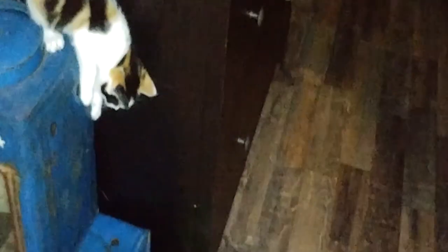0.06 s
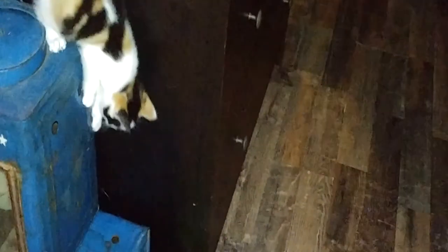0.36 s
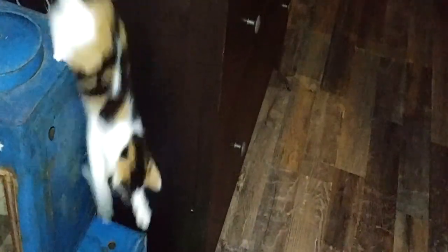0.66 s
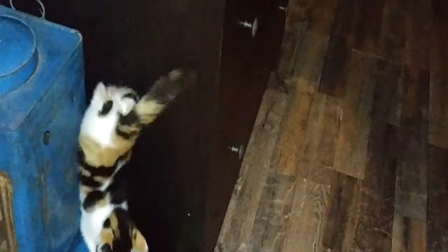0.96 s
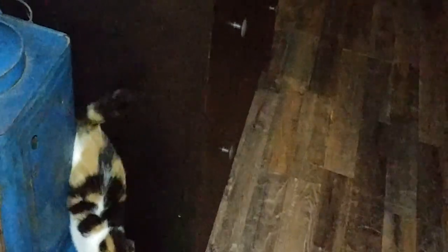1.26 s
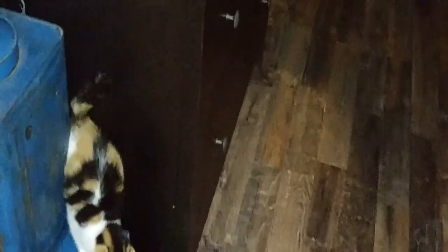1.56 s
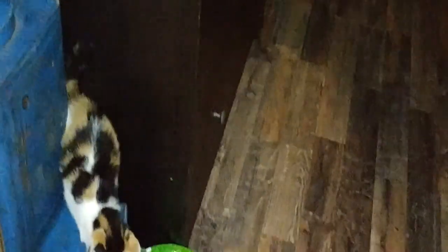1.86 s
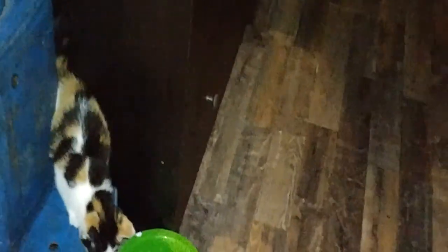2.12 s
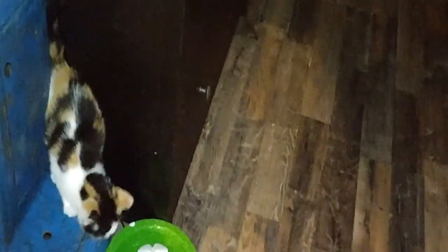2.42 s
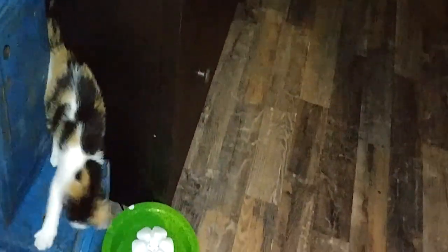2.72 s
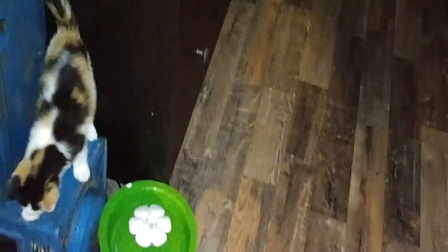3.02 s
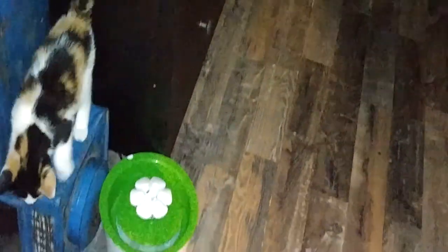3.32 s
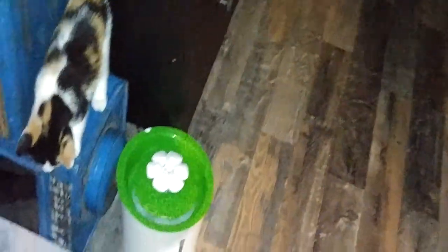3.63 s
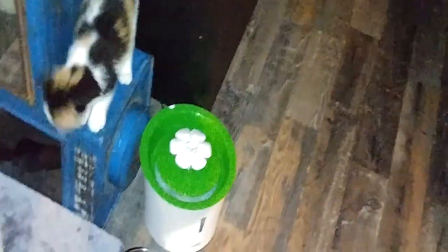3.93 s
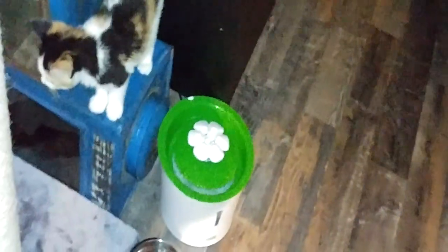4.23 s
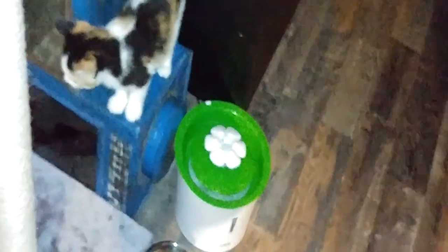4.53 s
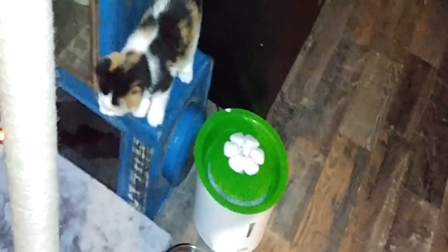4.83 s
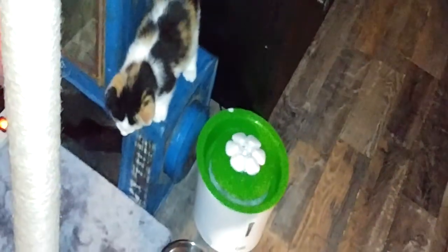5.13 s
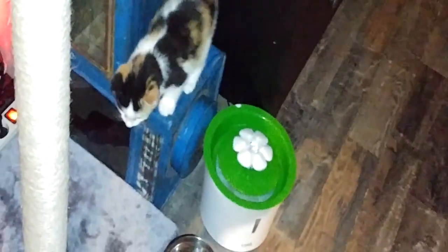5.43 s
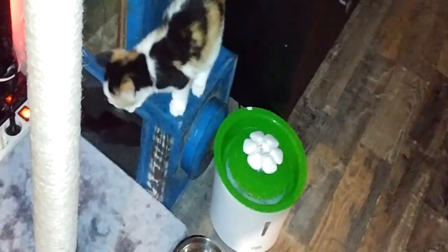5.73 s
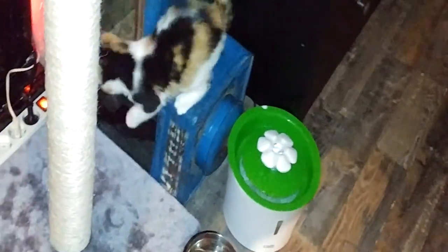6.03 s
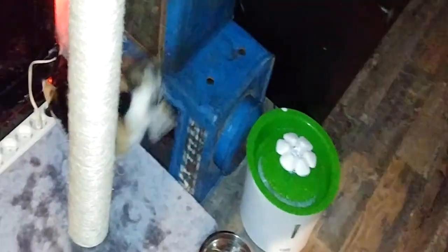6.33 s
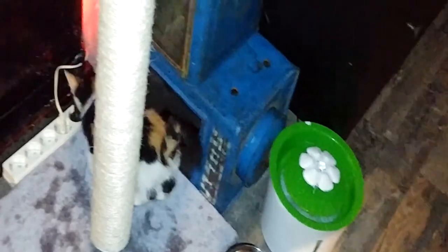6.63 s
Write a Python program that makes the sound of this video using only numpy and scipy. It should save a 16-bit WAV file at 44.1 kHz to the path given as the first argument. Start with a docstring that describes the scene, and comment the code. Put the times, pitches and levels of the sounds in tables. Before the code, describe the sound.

In a quiet room with a low hum and a faint distant motor, a kitten's claws scratch down painted metal, with hollow paw thumps and a soft landing. Two sharp snaps hit the microphone on the left, a few seconds apart, with tiny claw taps between them. Near the end come brief squeaks, a bright clatter of something hard, a small clink and two padded steps.

```python
"""A kitten slides down the side of a small metal stove on its claws, thumps the panel and lands on a ledge.
Something brushes the left microphone's opening with a sharp snap, claws tap lightly, and a second snap
follows. Then a hard object squeaks and clatters in the room, a smaller piece clinks, and two soft steps
sound on the ledge. Under it all lie a low room rumble, a steady hum and the faint drone of a far motor
that slowly rises, then sinks and fades."""
import sys
import numpy as np
from scipy import signal
from scipy.fft import rfft, irfft, next_fast_len
from scipy.io import wavfile

SR = 44100
rng = np.random.default_rng(int(sys.argv[2]) if len(sys.argv) > 2 else 0)


def log_audio(samples):
    """Write samples as a 16-bit WAV file to the path given in sys.argv[1]."""
    # one column per channel
    frames = np.atleast_2d(samples).T
    # limit to full scale, then quantise
    limited = np.clip(frames, -1, 1)
    pcm = np.round(limited * 32767).astype(np.int16)
    wavfile.write(sys.argv[1], SR, pcm)


N = 294147
TIME = np.arange(N) / SR

# tone colour (strength at each frequency) of claws on painted metal: f/Hz, level/dB
CLAW_COLOUR = [(700, -22), (1900, -5), (2700, 1.5), (3400, 0), (4200, 3), (6500, -1), (7700, 0.5),
               (9000, -13), (10300, -38), (12400, -22), (15000, -23), (17000, -31)]
# snaps at the microphone: t/s, tick/dB, air push/dB, sharp edge/dB, lead-in/s, first slip/dB, friction/dB
MIC_SNAPS = [(1.6041, -3, 1.5, -13.5, .0222, -20.5, -31), (4.3865, -2.5, -5.5, -35.5, .0039, -9, -35)]


def from_db(db):
    """Turn decibels into a factor to multiply by."""
    return 10 ** (np.asarray(db) / 20)


def rms_one(x):
    """Scale a signal so that its average strength (rms) is 1."""
    return x / np.sqrt(np.mean(x ** 2) + 1e-20)


def in_time(rows):
    """Join timed rows with straight lines, giving one curve per value column."""
    times, *columns = np.transpose(rows)
    return [np.interp(TIME, times, column) for column in columns]


def at_hz(points, hz):
    """Read between a table's rows, with every octave equally wide."""
    freqs, values = np.transpose(points)
    return np.interp(np.log(np.maximum(hz, 1)), np.log(freqs), values)


def pan(left_db):
    """Left and right gains that make the left side louder by left_db."""
    gains = from_db([[left_db / 2], [-left_db / 2]])
    return gains / gains.mean()


def drift(turns_per_s):
    """A random wandering curve of typical size 1."""
    knots = rng.standard_normal(int(N / SR * turns_per_s) + 2)
    return rms_one(np.interp(TIME * turns_per_s, np.arange(len(knots)), knots))


def envelope(start, attack_s, hold_s, fade_db_per_s):
    """Swell, hold, then die away."""
    age = TIME - start
    fade_db = np.clip(fade_db_per_s * (age - attack_s - hold_s), 0, 200)
    return np.clip(age / attack_s, 0, 1) * from_db(-fade_db)


def lowpass(x, hz, order=2):
    """Turn down what lies above hz."""
    return signal.sosfilt(signal.butter(order, min(hz, .45 * SR), fs=SR, output="sos"), x + 1e-18)


def highpass(x, hz, order=4):
    """Turn down what lies below hz."""
    return signal.sosfilt(signal.butter(order, hz, "high", fs=SR, output="sos"), x)


def through(x, response):
    """Let every sample of x set off a copy of the response (convolution)."""
    return signal.fftconvolve(np.atleast_2d(x), np.atleast_2d(response), axes=-1)[:, :N]


def impulse(colour, size=4096):
    """A short click with the given tone colour; peak 1."""
    cepstrum = irfft(np.log(from_db(at_hz(colour, np.fft.rfftfreq(size, 1 / SR)))))
    # pack the energy at the start (minimum phase)
    cepstrum[1:size // 2] *= 2
    cepstrum[size // 2 + 1:] = 0
    response = irfft(np.exp(rfft(cepstrum)))
    return response / np.abs(response).max()


def ringing(modes):
    """The fading tones of a struck body; each drops 60 dB in its ring time, t60."""
    t = TIME[:SR]
    response = sum(from_db(db - 60 * t / t60) * np.sin(2 * np.pi * hz * t) for hz, db, t60 in modes)
    return response / np.abs(response).max()


def clicks(times, levels_db):
    """One single-sample spike per contact."""
    samples = np.clip(np.round(np.atleast_1d(times) * SR), 0, N - 1).astype(int)
    return np.bincount(samples, from_db(np.atleast_1d(levels_db)), N)


def noise(colour):
    """Stereo noise of a given tone colour; the two sides are alike in the bass, not in the treble."""
    # how alike left and right are: f/Hz, correlation (1 = the same)
    likeness = [(30, .7), (60, 0.87), (120, 0.75), (300, 0.69), (700, 0.31), (2000, 0.23), (8000, 0.064)]
    size = next_fast_len(N)
    hz = np.fft.rfftfreq(size, 1 / SR)
    alike = np.clip(at_hz(likeness, hz), 0, 1)
    mid, side = rfft(rng.standard_normal((2, size))) * from_db(at_hz(colour, hz))
    spectrum = np.sqrt(1 + alike) * mid + np.sqrt(1 - alike) * side * [[1], [-1]]
    return rms_one(irfft(spectrum, size)[:, :N])


def room(x, wet_db):
    """Add the room's echo at level wet_db; its treble dies fastest."""
    # how long the room rings: f/Hz, ring time/s
    ring_times = [(100, 0.52), (400, 0.35), (1200, 0.35), (4000, .32), (8000, 0.29), (14000, 0.25)]
    size = SR // 2
    hz, t = np.fft.rfftfreq(size, 1 / SR), TIME[:size]
    white = rfft(noise([(20, 0), (20000, 0)])[:, :size])
    edges = np.geomspace(40, SR / 2, 13)
    tail = 0
    for low, high in zip(edges, edges[1:]):
        band = irfft(white * (hz >= low) * (hz < high), size)
        tail += band * from_db(-60 * t / at_hz(ring_times, np.sqrt(low * high)))
    tail *= 1 - np.exp(-t / .002)
    return x + from_db(wet_db) * through(x, rms_one(tail) / np.sqrt(size))


def nearby(x, wet_db, t60):
    """Add quick, dense echoes from the floor and furniture."""
    t = TIME[:SR // 6]
    echoes = rng.standard_normal((2, len(t))) * from_db(-60 * t / t60)
    return x + from_db(wet_db) * through(x, rms_one(echoes) / np.sqrt(len(t)))


def rumble():
    """The room's low noise, a little louder at first."""
    # tone colour of the rumble: f/Hz, level/dB
    colour = [(20, -29.5), (40, -21.5), (55, -11), (72, -0.5), (100, -2), (125, -6), (210, -6), (330, -8.5),
              (430, -14), (800, -15.5), (1600, -24.5), (3200, -32.5), (6500, -36.5), (10000, -45.5),
              (16000, -38.5)]
    # its loudness over time: t/s, level/dB
    loudness = [(0, -51), (.85, -58), (2, -57), (4.8, -55.5), (6.7, -57)]
    return noise(colour) * from_db(in_time(loudness)[0])


def hum(waver_db=0.5):
    """Appliances hum and faintly whine at steady pitches."""
    # appliance tones: f/Hz, level/dB
    tones = [(69, -68.5), (88, -65), (157.7, -64.5), (316, -71.5), (2495, -86)]
    return sum(from_db(db + waver_db * drift(3.9)) * np.sin(2 * np.pi * hz * TIME) for hz, db in tones)


def motor(waver_db=2.0, overtone_db=-14.5):
    """A far motor changes speed; each of its tones swells as it passes a pitch the room rings at."""
    # the motor's lowest tone: t/s, f/Hz, level/dB
    drone = [(0, 86, -69), (1.2, 87, -69), (1.55, 89.08, -66.5), (4.25, 103, -66), (4.6, 104, -69.5),
             (5.6, 93.7, -91), (6.7, 91.5, -79)]
    # room resonances: f/Hz, width/Hz, lift/dB
    resonances = [(89, 1, 11), (93.4, 1.8, 11), (101.7, 3, 11.5), (182, 6, 18), (192, 5, 19), (371, 7, 16)]
    pitch, level_db = in_time(drone)
    full_db = level_db.max()
    phase = 2 * np.pi * np.cumsum(pitch * (1 + 0.0033 * drift(9))) / SR
    out = 0
    for harmonic in (1, 2, 4):
        lift = sum(from_db(db) ** 2 / (1 + (2 * (harmonic * pitch - hz) / width) ** 2) ** 2
                   for hz, width, db in resonances)
        faded_db = full_db + (level_db - full_db) / harmonic   # the lowest tone fades most
        tone_db = faded_db + overtone_db * (harmonic > 1) + waver_db * drift(5.4)
        out += from_db(tone_db) * np.sqrt(1 + lift) * np.sin(harmonic * phase)
    return out


def background():
    """Hum, rumble and motor together; sqrt(2) gives a sine wave an rms of 1."""
    return (np.sqrt(2) * hum() + rumble() + np.sqrt(2) * motor()) * pan(4.8)


def squeaks(roughness=0.11):
    """Short, rough gliding tones as the hard object shifts on its support."""
    # squeaks: t/s, length/s, level/dB, start f/Hz, end f/Hz
    glides = [(5.167, 0.073, -63, 853, 1056), (5.23, 0.053, -53.5, 1149, 780),
              (5.345, 0.043, -48.5, 866, 950), (5.349, .035, -48, 375, 520)]
    out = np.zeros(N)
    for start, length, db, start_hz, end_hz in glides:
        progress = np.clip((TIME - start) / length, 0, 1)
        pitch = (start_hz + (end_hz - start_hz) * progress) * (1 + roughness * drift(600))
        out += from_db(db) * np.sin(np.pi * progress) * np.sin(2 * np.pi * np.cumsum(pitch) / SR)
    return room(out, wet_db=-4) * pan(6.6)


def clatter():
    """A hard object knocks and bounces some way off, heard mostly through its echoes."""
    # the object's hits: t/s, crack/dB, ring/dB, knock/dB, echo relative to the crack/dB
    hits = [(5.2999, -11.5, -48, -55, -1), (5.307, -9.5, -40, -59, -17), (5.387, -5, -30, -20, 2),
            (5.394, -5, -29, -22.5, -2), (5.399, -5, -15.5, -24.5, -13), (5.431, -14.5, -39, -22.5, 2.5)]
    # its ringing tones: f/Hz, level/dB, ring time/s
    object_tones = [(2568, 5, 0.12), (2990, -1, 0.23), (3200, 5, 0.21), (3400, 8.5, 0.14), (3370, -8, 0.24),
                    (3480, -7, .26), (3830, 10, 0.12), (3960, -12, .25), (4230, -9, .25), (4330, -11, 0.18),
                    (5050, -2, 0.14), (4570, -14, 0.25), (5970, -1, 0.2), (6600, -4, 0.23),
                    (7180, -19, .15), (7470, -1, 0.3)]
    # tone colour of the bright crack: f/Hz, level/dB
    crack_colour = [(800, -18.5), (1900, -15.5), (2500, -10), (3300, -0.5), (4600, 2.5), (5600, -2.5),
                    (7500, -1), (8800, -5.5), (10400, -36.5), (12500, -17.5), (15000, -15), (17000, -22)]
    # tone colour of the dull knock: f/Hz, level/dB
    knock_colour = [(50, -6), (100, 18), (150, 6.5), (240, 1), (350, 6), (560, -14.5), (800, 2.5),
                    (1400, 0), (1900, 2.5), (3000, -2.5), (6000, -62)]
    times, crack_db, ring_db, knock_db, tail_db = np.transpose(hits)
    crack, knock = impulse(crack_colour), impulse(knock_colour)
    cracks = nearby(through(clicks(times, crack_db), crack), wet_db=13.5, t60=0.091)
    far = through(clicks(times, crack_db + tail_db), crack) + through(clicks(times, knock_db), knock)
    rings = room(through(clicks(times, ring_db), ringing(object_tones)), wet_db=-12.5)
    return (from_db(-21) * (cracks + room(far, wet_db=21.5)) + rings) * pan(5.3)


def clink():
    """A smaller piece strikes twice in quick succession and rings briefly."""
    # the piece's hits: t/s, level/dB
    hits = [(5.63, -39), (5.636, -26.5)]
    # its ringing tones: f/Hz, level/dB, ring time/s
    piece_tones = [(2415, -12, 0.14), (3100, -10, 0.019), (4430, -4, 0.011), (4750, 5.5, 0.016),
                   (4900, -7, 0.016), (6200, -11, 0.016), (7700, -6.5, 0.038), (8000, -17, 0.017),
                   (12600, -6, 0.0035)]
    rings = highpass(through(clicks(*np.transpose(hits)), ringing(piece_tones)), 2320)
    return room(nearby(rings, wet_db=7.0, t60=0.063), wet_db=-4.0) * pan(5.3)


def slips(count=4, gap_ratio=.45, growth_db=2):
    """Ticks that come ever faster and stronger on the way to each snap."""
    k = np.arange(count)
    return sum(clicks(snap_s - lead * gap_ratio ** k, slip_db + growth_db * k)
               for snap_s, _, _, _, lead, slip_db, _ in MIC_SNAPS)


def friction(settle_s=.007, drag_s=0.02, lift_off_db_per_s=850):
    """Brushing noise: light during the slips, a burst at the snap, then a short drag."""
    # tone colour of the brushing: f/Hz, level/dB
    colour = [(60, -3), (150, 8), (330, -7), (700, -4.5), (1600, -1.5), (3500, -2.5), (7500, 1),
              (9000, -5.5), (10500, -33.5), (12500, -22), (15000, -12.5), (17000, -29)]
    power = 0
    for snap_s, _, _, _, lead, _, db in MIC_SNAPS:
        touch = envelope(snap_s - lead - settle_s, settle_s, lead, lift_off_db_per_s)
        before = from_db(-12.5) * touch ** 2
        burst = from_db(7.5) * envelope(snap_s, 0.00067, 0, fade_db_per_s=1300)
        drag = envelope(snap_s, .001, drag_s, lift_off_db_per_s)
        power += from_db(db) ** 2 * (before ** 2 + burst ** 2 + drag ** 2)
    return noise(colour)[0] * np.sqrt(power)


def air_push(kicks, push_hz=1990, leak_hz=126, leak_width_hz=130):
    """Air trapped in the microphone's opening swings down, then up, and leaks with a short low ring."""
    swing = np.exp(-2 * np.pi * push_hz / SR)
    smoothed = lowpass(kicks, push_hz, order=5)
    pressure = signal.lfilter([-swing, 1], [1, -swing], smoothed) * SR / (np.pi * push_hz)
    decay = np.exp(-np.pi * leak_width_hz / SR)
    feedback = [1, -2 * decay * np.cos(2 * np.pi * leak_hz / SR), decay ** 2]
    return signal.lfilter([1, -2, 1], feedback, pressure)


def microphone_snaps(slip_push_db=-23, slip_edge_db=-33, case_db=-25):
    """Something slips and snaps at the left microphone; the right gets a dull trace through the case."""
    # tone colour of the tick: f/Hz, level/dB
    tick_colour = [(300, -28), (1500, -10), (2100, -8.5), (3000, -3), (4200, -3), (5800, -1.5), (7800, 2.5),
                   (9000, -17), (10500, -45.5), (15000, -32.5)]
    # tone colour of its sharp, very high edge: f/Hz, level/dB
    edge_colour = [(3000, -31.5), (11000, -33), (13000, -1.5), (15000, -1), (16500, -21.5)]
    # tones of the microphone's case: f/Hz, level/dB, ring time/s
    case_tones = [(139.74, 0, 0.054), (330, -5, .035)]
    times, tick_db, push_db, edge_db = np.transpose(MIC_SNAPS)[:4]
    run_up = slips()
    ticks = through(clicks(times, tick_db) + run_up, impulse(tick_colour))[0]
    edges = through(clicks(times, edge_db) + from_db(slip_edge_db) * run_up, impulse(edge_colour))[0]
    push = air_push(clicks(times, push_db) + from_db(slip_push_db) * run_up)
    thud = through(clicks(times, push_db + case_db), ringing(case_tones))[0]
    left = ticks + edges + push + thud + friction()
    right = from_db(-25.0) * room(lowpass(left, 1100, order=1), wet_db=-2.5)[1]
    return np.array([left, right])


def claw_touches(sharpness=3.7, scrape_db=-8):
    """Short scuffs that swell and fade around one pitch, each with a little scrape of claw on paint."""
    # light touches: t/s, level/dB, swell/s, centre f/Hz
    touches = [(0.19, -41.5, .0097, 1850), (0.53, -50.5, 0.0058, 930), (2.514, -63, .013, 7700),
               (2.695, -73, .012, 4500), (2.862, -75, 0.0071, 7490), (3.084, -61.5, 0.011, 8600),
               (3.129, -64.5, 0.016, 8000), (3.692, -75, .006, 6980)]
    out = np.zeros((2, N))
    scrape = from_db(scrape_db) * noise(CLAW_COLOUR)
    for start, db, swell, hz in touches:
        age = TIME[:SR // 4] / swell
        dull_noise = lowpass(rng.standard_normal((2, len(age))), hz, order=6)
        scuff = rms_one(signal.lfilter(*signal.iirpeak(hz, sharpness, fs=SR), dull_noise))
        span = slice(int(start * SR), int(start * SR) + len(age))
        out[:, span] += from_db(db) * (scuff + scrape[:, span]) * age * np.exp(1 - age)
    return out * pan(2.4)


def paw_thumps(lowest_hz=75, sharpness=2.2):
    """Padded paws set the stove's side and ledge booming; a slower push favours the lower tones."""
    # paws striking the side: t/s, level/dB, centre f/Hz of the push
    blows = [(.003, -23.5, 198), (.032, -27.5, 300), (.262, -9.5, 240), (0.28, -17, 242), (.295, -9, 171),
             (.302, -18.5, 380), (.314, -9.5, 84), (.328, -18, 230), (.338, -8.5, 148), (.372, -17.5, 235),
             (.4, -24, 195), (.43, -37, 200), (.492, -35, 209)]
    # tones of the side panel: f/Hz, level/dB, ring time/s
    panel_tones = [(81, -4.5, 0.076), (144, -5.5, 0.062), (206, 0.5, 0.052), (228, -5, 0.071),
                   (276, -1, 0.055), (385, -4, 0.031)]
    # soft steps on the ledge: t/s, level/dB
    steps = [(.54, -37.5), (.558, -35), (5.774, -41), (5.813, -46)]
    # tones of the ledge: f/Hz, level/dB, ring time/s
    ledge_tones = [(113.4, 1, 0.34), (196, 3, 0.056), (293, -11, 0.22)]
    pushes = 0
    for start, db, hz in blows:
        soft_blow = lowpass(clicks(start, db), 2 * hz)
        pushes += signal.lfilter(*signal.iirpeak(hz, sharpness, fs=SR), soft_blow)
    panel = through(pushes, ringing(panel_tones))
    ledge = through(clicks(*np.transpose(steps)), ringing(ledge_tones))
    return highpass(room(panel + ledge, wet_db=-10), lowest_hz) * pan(4.3)


def kitten_slide(grains_per_s=1200, grain_db=4.0, bright_hz=7500, judder_db=1.0, judders_per_s=70):
    """Claws catch in tiny uneven slips, brighter when they glide lightly, while fur rubs the panel."""
    # strokes down the panel: t/s, swell/s, hold/s, claws/dB, fur/dB, brightness/dB
    strokes = [(0, 0.0015, 0.0044, -56.5, -47, -12), (0.023, 0.0098, 0.032, -50, -61, -16),
               (.105, 0.0095, .008, -36.5, -51, 3.5), (0.122, 0.017, 0.0084, -35, -40.5, 3.5),
               (0.168, 0.026, 0.12, -45.5, -41, -7), (0.51, 0.027, 0.072, -66, -57, 10.5),
               (0.639, 0.056, 0.022, -59.5, -72, 12.5)]
    # tone colour of rubbing fur: f/Hz, level/dB
    fur_colour = [(45, -20), (75, -3.5), (130, 3.5), (280, -4.5), (480, -7), (900, -4.5), (1400, -15.5),
                  (2000, -24), (3000, -45)]
    claw_power = hiss_power = fur_power = 0
    for start, swell, hold, claw_db, fur_db, bright_db in strokes:
        stroke = from_db(claw_db) * envelope(start, swell, hold, fade_db_per_s=232)
        claw_power += stroke ** 2
        hiss_power += (from_db(bright_db) * stroke) ** 2
        fur_power += (from_db(fur_db) * envelope(start, swell, hold, fade_db_per_s=150)) ** 2
    catches = (rng.random(N) < grains_per_s / SR) * rng.choice([-1, 1], N)
    grains = catches * from_db(grain_db * np.minimum(rng.exponential(1, N), 4))
    grit = rms_one(through(grains, impulse(CLAW_COLOUR)))
    hiss = rms_one(highpass(noise(CLAW_COLOUR), bright_hz, order=2))
    scrape = 0.47 * grit + 0.62 * noise(CLAW_COLOUR)
    claws = scrape * np.sqrt(claw_power) + 0.5 * hiss * np.sqrt(hiss_power)
    fur = noise(fur_colour) * np.sqrt(fur_power)
    return (claws * pan(7.0) + fur * pan(4.8)) * from_db(judder_db * drift(judders_per_s))


def scene(right_lag_s=0.0001):
    """All sources at the two microphones; sound from the room reaches the right one a little later."""
    left, right = (background() + kitten_slide() + paw_thumps() + claw_touches()
                   + squeaks() + clatter() + clink())
    late_right = np.interp(TIME - right_lag_s, TIME, right)
    return np.array([left, late_right]) + microphone_snaps()


def record(dry, ceiling=.84, cutoff_hz=16000):
    """The sharpest peaks overload and are flattened; the highest treble is cut."""
    treble_cut = signal.ellip(12, .1, 80, cutoff_hz, fs=SR, output="sos")
    return signal.sosfilt(treble_cut, np.clip(dry, -ceiling, ceiling))


dry = scene()
out = record(dry)
log_audio(out)
```